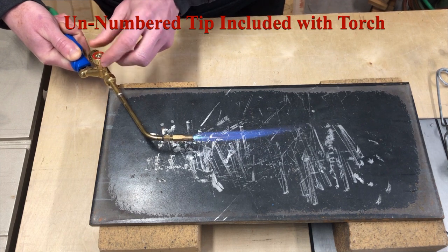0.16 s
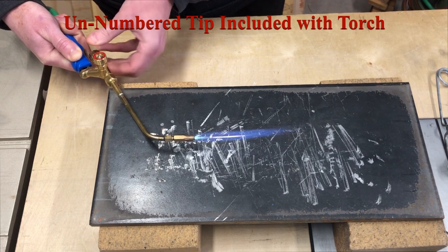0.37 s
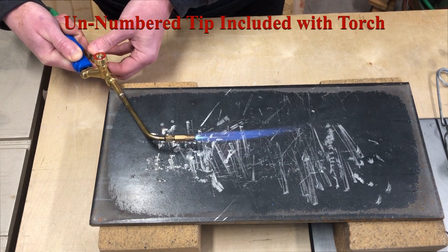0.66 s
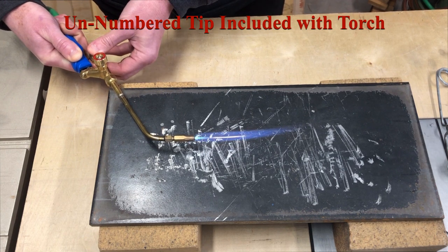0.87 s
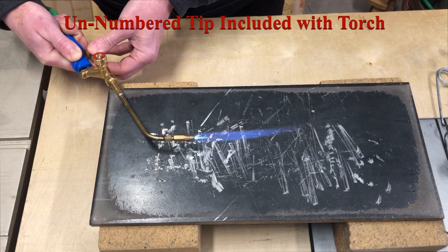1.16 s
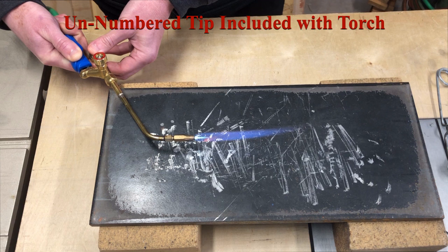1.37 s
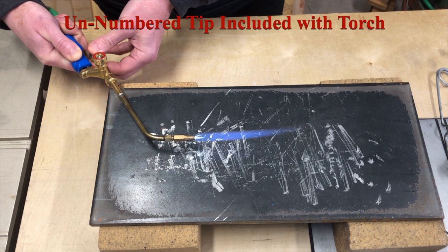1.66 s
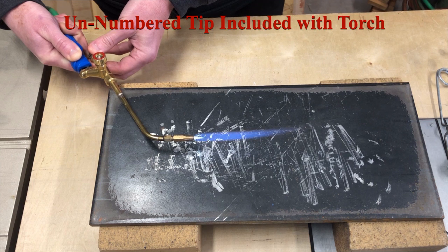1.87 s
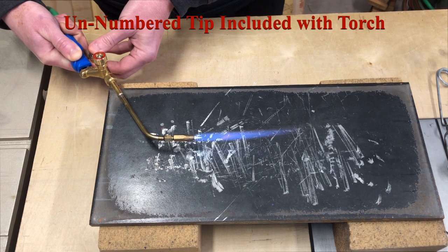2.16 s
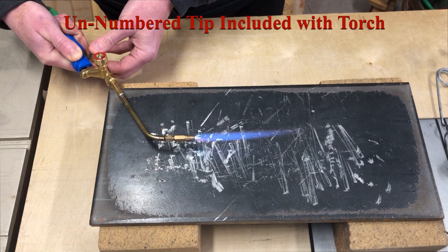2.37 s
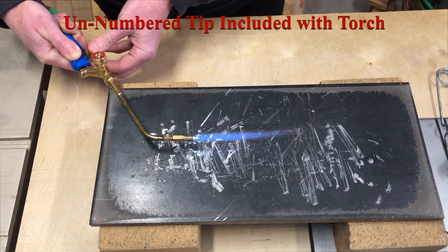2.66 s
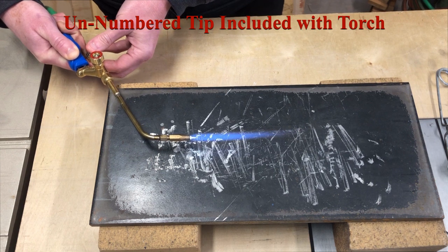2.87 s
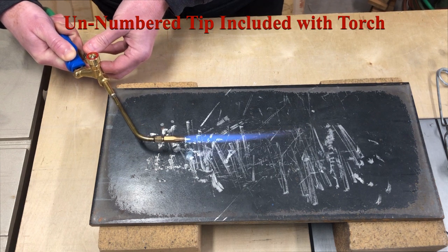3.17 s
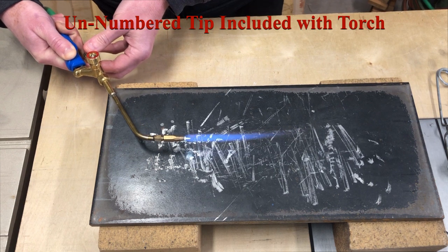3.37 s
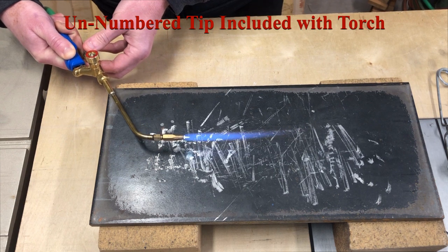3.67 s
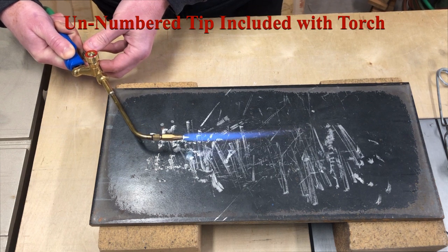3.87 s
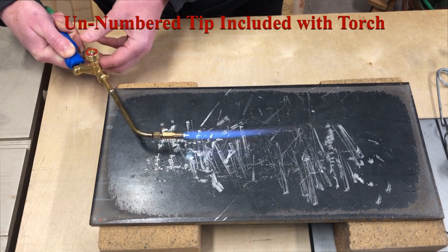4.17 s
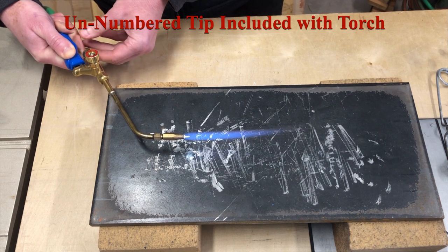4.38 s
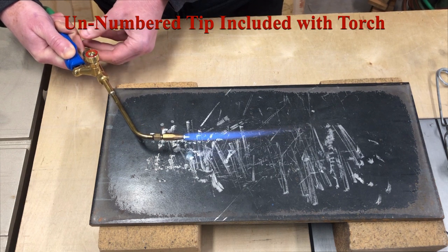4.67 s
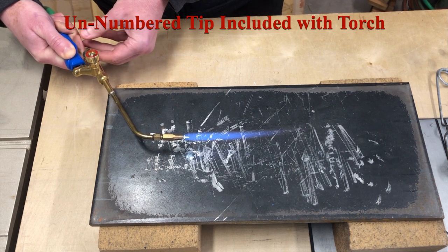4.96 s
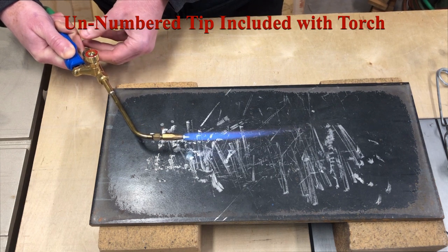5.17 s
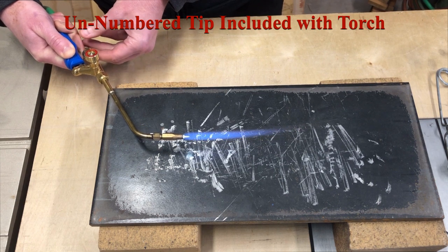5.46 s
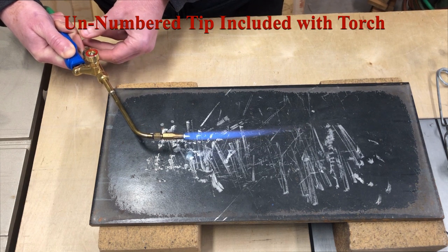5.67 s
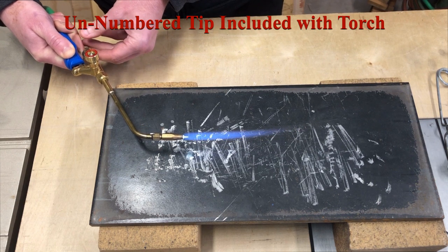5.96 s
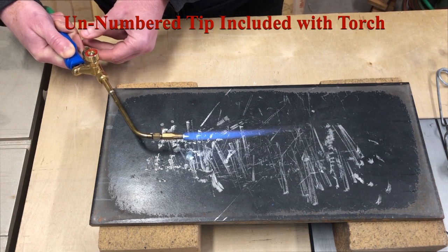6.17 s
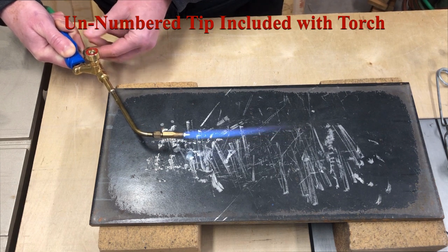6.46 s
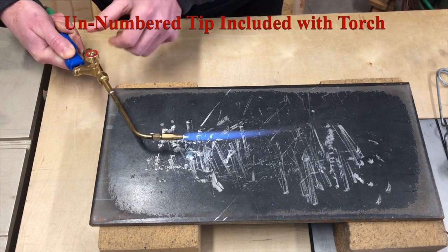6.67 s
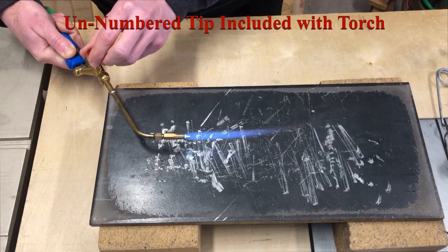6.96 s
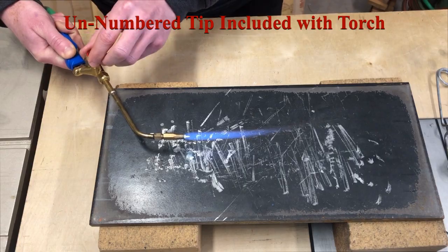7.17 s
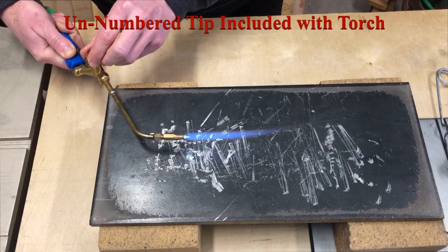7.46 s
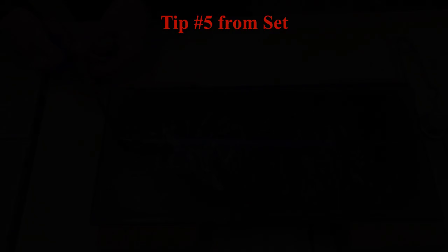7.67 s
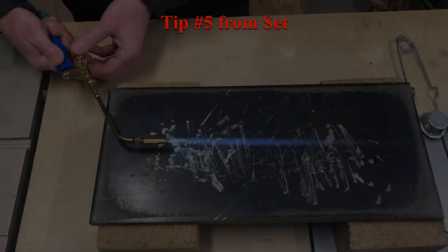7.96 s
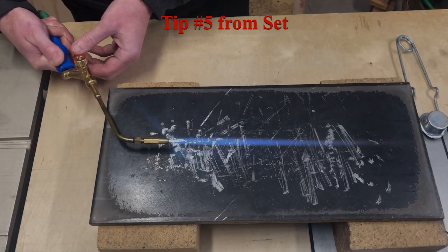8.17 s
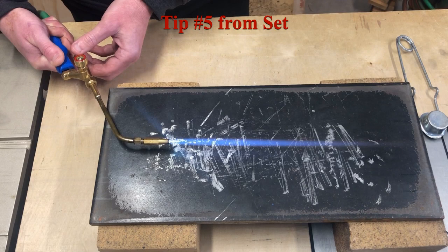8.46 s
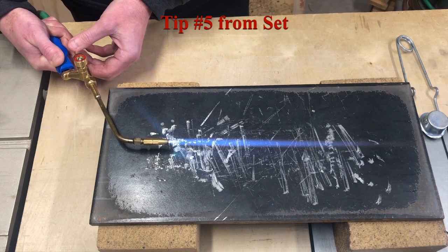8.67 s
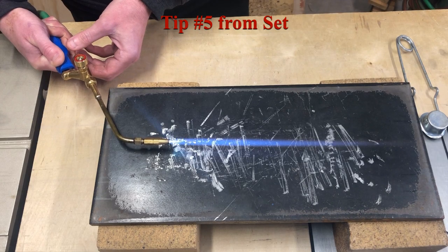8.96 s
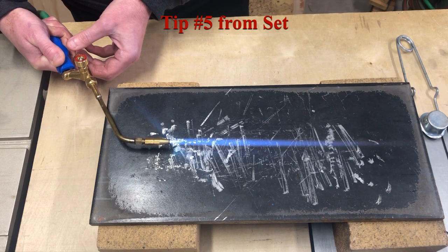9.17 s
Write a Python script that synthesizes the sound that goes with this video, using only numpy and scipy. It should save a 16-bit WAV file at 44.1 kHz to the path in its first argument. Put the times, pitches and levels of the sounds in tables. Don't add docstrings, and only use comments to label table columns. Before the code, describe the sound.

A small gas flame sputters softly, grows into a steady hissing roar as its valve opens, then abruptly becomes a far louder, brighter jet.

```python
import sys
import numpy as np
from scipy import signal
from scipy.fft import rfft, irfft, next_fast_len
from scipy.io import wavfile
from scipy.ndimage import uniform_filter1d

SR = 44100
rng = np.random.default_rng(int(sys.argv[2]) if len(sys.argv) > 2 else 0)


def int16_out(signal):
    q = np.round(np.clip(np.atleast_2d(signal).T, -1, 1) * 32767)
    wavfile.write(sys.argv[1], SR, q.astype(np.int16))


def rack_gain(trim_db):
    fader = np.asarray(trim_db, float)
    return 10 ** (fader / 20)


N = 411012

CHANGE_S = 7.652
EDGE_HZ = 15745
FRAME_S = 1001 / 24000
SMALL_SPLICE_S, LARGE_SPLICE_S = .01846, .02172

# time in seconds, opening (0 low flame, 1 half open, 2 and more wide open).
VALVE_OPENING = [
    (0, 0.045),
    (1.2, 0.24),
    (1.8, 0.5),
    (2.4, 0.71),
    (3.2, 0.94),
    (3.6, 1.66),
    (4.1, 2.43),
    (6, 2.71),
    (7.65, 3.02),
]
# time in seconds, roar level in dB.
FLAME_STRENGTH = [(0, -57), (1.0, -56.5), (1.4, -54.5), (1.9, -51), (2.8, -51), (3.05, -53), (3.35, -53),
                  (3.55, -51), (4.1, -52), (5.3, -50), (6.5, -51.5), (7.4, -50), (7.65, -51)]
# valve opening, throat level in dB, jet level in dB.
LAYER_BALANCE = [(0, -10.5, -11.5), (.22, -12.5, -16), (.48, -12.5, -9), (.8, -6.5, -9), (.95, -5, -6.5),
                 (1.7, -9, -6), (2.1, -10, -5), (2.6, -10, -5), (3.2, -8.5, 0)]
# middle in seconds, length in seconds, change in dB.
SPUTTERS = [
    (.02, 0.033, -0.5),
    (.23, 0.094, -2.5),
    (.5, 0.061, -2.5),
    (.7, 0.075, -3),
    (.9, 0.096, -2),
    (1.25, .05, -1),
    (5.93, 0.087, -2),
    (6.72, 0.052, 1),
]
# middle in seconds, length in seconds, change in dB.
DRAUGHTS = [(.4, .3, 4.5), (.62, 0.1, 2), (.97, 0.54, 5), (1.33, 0.11, 1), (1.63, .2, 6), (1.79, 0.14, 5),
            (1.92, 0.19, 6.5), (2.14, 0.28, 5.5), (2.4, 0.17, 4.5), (2.75, 0.18, 3), (3.15, 0.55, -4),
            (5.1, .7, 2.5), (6.9, .3, 1.5), (7.35, 0.36, 5)]
# frequency in Hz, strength in dB per Hz.
ROAR_COLOURS = [
    [(470, -51), (800, -16), (984, -10), (1230, -8), (1270, -5.5), (1340, -4), (1570, -5), (1990, -3.5),
     (2190, -7), (2350, 0.5), (3300, -14), (4290, -58), (7260, -120)],
    [(470, -52), (800, -23), (984, -17), (1150, -15.5), (1290, -9.5), (1460, -7), (1820, -6), (1950, -5.5),
     (2100, -4.5), (2650, -2.5), (3300, -8), (4290, -35), (7260, -120)],
    [(470, -36), (800, -18), (1210, -11), (1330, -6), (1400, -7), (1830, -4), (1950, -3), (2190, -3.5),
     (2330, -0.5), (2680, -2), (3300, -9), (4290, -29.5), (7260, -120)],
]
# frequency in Hz, strength in dB per Hz.
FLAP_COLOURS = [
    [(150, -40), (250, -12.5), (355, -3), (499, 0.5), (589, -6), (701, 0.5), (755, -7.5), (800, -20),
     (1040, -46), (1760, -120)],
    [(150, -44), (250, -12), (302, -4), (455, -1), (595, -4), (671, 1.5), (755, -0.5), (800, -8),
     (1040, -43), (1760, -120)],
    [(150, -49), (250, -10.5), (360, -3.5), (409, -5), (509, -0.5), (595, -6.5), (695, 3.5), (800, -17),
     (1040, -38), (1760, -120)],
]
# frequency in Hz, strength in dB per Hz.
THROAT_COLOURS = [
    [(1940, -40), (3300, -18), (3500, -5.5), (3890, -3), (4600, -8.5), (5960, -12.5), (6600, -13.5),
     (7400, -19), (9620, -54), (16300, -120)],
    [(1940, -28), (3300, 1.5), (4040, -6.5), (4660, -2.5), (5570, -8.5), (6080, -8.5), (6600, -5.5),
     (7400, -5), (9620, -33), (16300, -120)],
    [(1940, -36), (3300, -2), (3870, -6), (4640, -3.5), (4980, -5.5), (5800, -10.5), (6780, -7.5),
     (7400, -11), (9620, -38), (16300, -120)],
]
# frequency in Hz, strength in dB per Hz.
JET_COLOURS = [
    [(4350, -50), (7400, -26), (7800, -12), (8130, -9), (8470, 2), (9240, -4), (10200, 9.5), (12300, -15),
     (13100, -5), (15600, -7)],
    [(4350, -26), (7400, -8), (8210, -10), (8600, -4.5), (8850, -4), (9570, -6), (10800, -1), (12300, -8),
     (13500, 5.5), (15600, -4)],
    [(4350, -76), (7400, -10), (8660, -4), (9040, -4), (9480, -5), (10900, 0.5), (12000, -11.5),
     (13300, -1), (15600, -9)],
]
# frequency in Hz, width in Hz, lift in dB.
SMALL_TUBE = [(710, 105, 3.5), (810, 91, -6), (930, 40, -4), (1050, 25, -1), (1196, 48, -5),
              (1510, 34, 2.5), (3460, 50, 1), (3610, 37, -1), (1323, 35, 7.5), (1440, 91, 0),
              (1690, 74, 2.5), (1844, 50, -6), (1986, 52, 2.5), (2060, 50, 1), (2100, 46, -2),
              (2330, 89, 2), (2500, 48, -4.5), (2605, 130, 4), (2792, 46, 3.5), (2870, 60, -2),
              (2997, 90, 4.5), (3126, 80, -4), (3272, 70, 3), (3375, 50, -6.5), (3800, 50, -1),
              (4420, 90, 4), (4545, 90, 5.5), (4690, 110, 4), (4800, 100, 0), (4970, 72, 0), (5460, 50, 0),
              (5700, 60, -1), (5700, 90, 3.5), (5950, 90, -2), (6110, 76, 4.5), (6230, 70, -4),
              (6420, 74, 5), (6470, 50, -4), (6840, 74, -5.5), (6930, 85, 3.5), (7090, 60, 0),
              (7220, 60, -7), (8810, 270, 6.5), (9300, 250, -1), (10930, 150, -5), (11300, 180, 1),
              (11400, 90, 5), (11840, 250, 4), (13470, 80, -3), (14150, 250, -2.5), (14450, 250, 3),
              (15770, 150, 11.5)]


def small_tip():
    t = np.arange(N) / SR
    flame_db = curves(FLAME_STRENGTH, t)[0]
    sputter_db = swells(SPUTTERS, t)
    throat_over_db, jet_over_db = curves(LAYER_BALANCE, curves(VALVE_OPENING, t)[0])
    roar_db = flame_db + sputter_db + 0.25 * drift(20.0, 3.4)
    flap_db = -71 + swells(DRAUGHTS, t) + 0.91 * sputter_db + 0.7 * drift(27.0, 5.)
    throat_db = flame_db + throat_over_db + 0.27 * sputter_db + 0.22 * drift(11.0)
    jet_db = flame_db + jet_over_db + 0.69 * sputter_db + 0.34 * drift(22.0)

    flutter, lick = drift(90.0), drift(32.0)
    roar_db += 0.49 * flutter + 0.53 * drift(400.)
    flap_db += 0.39 * flutter + 0.32 * lick
    throat_db += 0.24 * flutter
    jet_db += 0.2 * flutter + 0.57 * drift(400.)

    roar = turbulence(ROAR_COLOURS, SMALL_TUBE, patchy_db=0.38, ripple_db=1.23, size=2048)
    flap = turbulence(FLAP_COLOURS, SMALL_TUBE, patchy_db=0.9, ripple_db=0.6, size=2048)
    throat = turbulence(THROAT_COLOURS, SMALL_TUBE, slab_and_valve, patchy_db=0.63, ripple_db=2.1)
    jet = turbulence(JET_COLOURS, SMALL_TUBE, slab_and_valve, patchy_db=0.95, ripple_db=0.5, size=512)
    return rack_gain(roar_db) * roar + rack_gain(flap_db) * flap + rack_gain(throat_db) * throat + rack_gain(jet_db) * jet


# time in seconds, centre in Hz, depth in dB.
SLAB_VALLEY = [(0, 7300, 11), (1, 7640, 1), (2, 7700, 8), (2.9, 8260, 8), (3.5, 7440, 9), (4.5, 7300, 10),
               (6.5, 7300, 9), (6.9, 7450, 11), (7.65, 7600, 13)]
# time in seconds, frequency in Hz, lift in dB.
VALVE_WHISTLE = [(0.0, 6600, 4), (0.9, 6650, 5), (1.3, 6630, 12), (1.81, 6750, 6), (2.26, 6650, 5),
                 (2.77, 6610, 11.5), (4.3, 6740, 14), (4.7, 6750, 10), (5.45, 6770, 11), (5.91, 6880, 14),
                 (7.64, 6600, 7)]
# time in seconds, frequency in Hz, lift in dB.
TOP_RIDGE = [(0, 13300, 6), (2, 13000, 1), (3.2, 13400, -2.5), (4.5, 13600, 5.5), (6, 13200, 6),
             (7, 13300, 7.5), (7.65, 12900, 10.5)]
# middle in seconds, length in seconds, rise in Hz.
RIDGE_LEAPS = [(.035, .025, 1100), (.165, 0.023, 900), (.31, .03, 900), (.367, .025, 1300),
               (.41, .015, 1000), (.437, .02, 1200), (.56, .04, 1900), (.625, .03, 1300), (.72, .04, 700),
               (.84, .04, 1000), (.95, .025, 900), (.995, .025, 900), (1.04, .03, 800), (1.11, .03, 700),
               (1.27, .03, 1200), (1.31, .03, 900), (1.345, .03, 1600), (1.4, 0.03, 900),
               (1.52, 0.039, 1300)]
# middle in seconds, length in
# seconds, centre in Hz, width in Hz, change in dB.
HISS_CHANGES = [(.25, .04, 5900, 2200, -9), (.285, .015, 5800, 2200, -8), (.45, .02, 6200, 1500, -7),
                (.49, .04, 6000, 2400, -9), (.71, .04, 6000, 3200, -10), (.77, .02, 6400, 3200, -8),
                (.875, .03, 6400, 2400, -9), (.92, .035, 6000, 2400, -9), (.87, .03, 11000, 4000, -7),
                (1.43, .24, 13400, 700, 5), (1.25, .02, 10500, 2500, -5), (1.55, .1, 12000, 1200, -4),
                (.085, .06, 10200, 1500, 4), (.165, .035, 10500, 2000, 6), (.25, .03, 10500, 2500, -5),
         (.335, .025, 10500, 2500, -5), (.5, .07, 10700, 2200, -6), (.45, .09, 8700, 900, 5),
         (.71, .1, 10500, 2200, -5), (.83, .05, 10500, 2200, 3), (.91, .05, 10500, 2200, -6),
         (1.19, .1, 12000, 1800, 5), (1.385, .07, 11000, 1200, -5), (1.455, .05, 9100, 1800, 3),
         (1.51, .05, 10200, 1500, -5), (.6, 1.3, 12300, 900, 3), (.7, 1.4, 9300, 300, -4),
         (.6, 1.1, 13400, 700, 3), (2.6, 1.5, 9450, 450, -5), (4.05, .5, 4470, 500, -3.5),
         (1.43, .24, 13450, 450, 1), (1.49, .12, 11400, 1500, -7), (6.85, .25, 7700, 700, -3),
         (7.05, 0.55, 8800, 600, -4), (5.5, .3, 4600, 500, 1), (6.55, .4, 5900, 700, -2)]


def slab_and_valve(hz, t):
    valley_hz, depth_db = curves(SLAB_VALLEY, t)
    whistle_hz, whistle_db = curves(VALVE_WHISTLE, t)
    ridge_hz, ridge_db = curves(TOP_RIDGE, t)
    change_db = whistle_db * bell(hz, whistle_hz, 164.0)
    change_db += ridge_db * bell(hz, ridge_hz, 1300.0)
    change_db -= depth_db * bell(hz, valley_hz, 780.0)

    tears = rng.standard_normal((len(t), len(hz))).T
    tears = uniform_filter1d(tears, size=len(hz) // 8, axis=0)
    tears = evened(uniform_filter1d(tears, size=2, axis=1))
    starved = np.clip(1 - 0.96 * curves(VALVE_OPENING, t)[0], 0, 1) * bell(hz, 9000.0, 5000.)
    change_db += 3.5 * starved * tears

    rest_hz, width_hz, leap_db = 10200., 1300., 12
    rise_hz = sum(rise * np.exp(-(2 * (t - s) / length) ** 2) for s, length, rise in RIDGE_LEAPS)
    change_db += leap_db * (bell(hz, rest_hz + rise_hz, width_hz) - bell(hz, rest_hz, width_hz))
    return change_db + moments(HISS_CHANGES, hz, t)


# time in seconds, level in dB.
LARGE_FLOW = [(7.65, -37), (8.2, -36), (8.3, -35.5), (8.85, -35.5), (8.95, -37), (9.03, -34.5), (9.32, -35)]
# middle in seconds, length in seconds, change in dB.
SURGES = [(7.68, 0.026, 0.5), (7.76, .04, 1.5), (7.92, .04, 0.5), (8.95, 0.027, 0), (9.08, 0.034, 2),
          (7.885, 0.058, -2.5), (7.965, 0.017, 0), (8.0, 0.02, -4), (8.103, 0.026, -3), (8.135, .03, 2),
          (8.225, 0.033, -1), (8.275, 0.066, 2.5), (8.51, 0.053, 1), (8.66, 0.018, -5), (8.72, 0.017, 4.5),
          (9.115, .02, -0.5), (9.235, 0.018, 3), (9.275, 0.013, 2)]
# middle in seconds, length in seconds, swell in dB.
LOW_SWELLS = [
    (7.955, .025, 3),
    (8.053, 0.064, 4.5),
    (8.172, 0.038, 2.5),
    (8.222, 0.033, 7),
    (8.907, 0.025, 2.5),
    (8.99, 0.05, 4.5),
    (9.27, 0.035, 4),
]
# frequency in Hz, strength in dB per Hz.
LARGE_ROAR = [(350, -45), (600, -21), (658, -5), (745, -8.5), (967, 0.5), (1170, 2.5), (1620, -4),
              (1900, -11.5), (2470, -31), (4180, -120)]
# frequency in Hz, strength in dB per Hz.
LARGE_LOW = [(1120, -32), (1900, -11.5), (3110, -3.5), (3490, 2.5), (4080, -9), (4500, -1.5), (5000, -12),
             (6500, -44), (11000, -120)]
# frequency in Hz, strength in dB per Hz.
LARGE_JET = [(2940, -63), (5000, -18), (5500, -3.5), (6100, -13), (6430, -8), (6540, 2.5), (8500, 4),
             (10500, -1), (11500, -0.5), (12850, 1), (13150, 5), (13600, -24), (22000, -80)]
# frequency in Hz, strength in dB per Hz.
LARGE_TOP = [(7760, -60), (12900, -30), (13250, -9), (13900, -4), (14300, 0), (14900, -1), (15200, -3),
             (15500, 0), (16500, 0)]
# frequency in Hz, strength in dB per Hz.
PIPE_TONE = [(4400, -78), (5250, -18), (5470, -5), (5535, -1), (5680, -7), (5900, -17), (7000, -70)]
# frequency in Hz, width in Hz, lift in dB.
LARGE_TUBE = [(684, 55, 2), (1150, 480, 1.5), (2220, 390, 7), (2670, 470, 4), (3130, 80, -4),
              (3490, 130, 4), (3540, 120, -6.5), (3900, 350, 1), (4200, 130, -3), (4030, 100, 2),
              (4300, 70, -2), (4385, 140, 7), (4700, 120, -3), (4560, 260, 4.5), (5620, 620, 10),
              (6060, 120, 1), (6250, 120, 5), (6530, 200, 4), (7300, 420, 2.5), (7600, 110, 1.5),
              (7760, 250, -2), (8300, 200, 2), (8700, 250, -2.5), (8980, 220, 5.5), (9100, 350, 0.5),
              (9500, 150, -2), (9980, 430, 6.5), (10480, 150, -7), (10980, 260, 6.5), (11380, 600, 5),
              (12080, 500, 5.5), (12820, 200, 1), (13080, 120, -4), (13250, 90, -13), (13440, 120, 3),
              (13700, 300, 4), (13880, 140, -4), (14000, 220, 5), (14330, 120, -2), (14730, 100, 3),
              (15200, 160, -4)]


def large_tip():
    t = np.arange(N) / SR
    flow_db = curves(LARGE_FLOW, t)[0]
    surge_db, swell_db = swells(SURGES, t), swells(LOW_SWELLS, t)
    bursts = drift(330.0, 16.0)

    roar_db = -52.5 + 0.5 * swell_db + 0.38 * drift(40.) + 0.2 * bursts
    low_db = -51 + swell_db + 0.42 * surge_db + 0.5 * bursts
    jet_db = flow_db + surge_db + 1.87 * bursts
    top_db = flow_db - 7 + 1.5 * (t - CHANGE_S)
    top_db += 0.54 * surge_db - 0.9 * swell_db + 0.6 * bursts + 1.2 * drift(300.)
    pipe_db = flow_db - 12.5 + 2 * np.tanh((t - 8.05) / .15)
    pipe_db += 0.4 * surge_db + 0.5 * bursts

    out = rack_gain(roar_db) * turbulence([LARGE_ROAR], LARGE_TUBE, patchy_db=1.0, ripple_db=1.5)
    out += rack_gain(low_db) * turbulence([LARGE_LOW], LARGE_TUBE, large_changing, patchy_db=0.75, ripple_db=0.6)
    out += rack_gain(jet_db) * turbulence([LARGE_JET], LARGE_TUBE, large_changing, patchy_db=1.5, ripple_db=-0.5)
    out += rack_gain(top_db) * turbulence([LARGE_TOP], LARGE_TUBE, patchy_db=1.5, ripple_db=0.4)
    return out + rack_gain(pipe_db) * turbulence([PIPE_TONE], patchy_db=0.5, ripple_db=0.0)


# middle in seconds, length in seconds, centre in Hz,
# width in Hz, change in dB.
LARGE_CHANGES = [(7.95, .03, 2600, 1200, 3), (8.06, 0.04, 3200, 990, 5), (8.225, 0.04, 3200, 1300, 6.5),
                 (7.72, .05, 3400, 400, 3), (8.14, .03, 3300, 500, 3), (8.225, .04, 4500, 700, -2),
                 (9.0, .05, 4200, 500, -1), (9.265, 0.093, 7900, 3000, -4.5), (6, 0.035, 12700, 2400, -11),
                 (8.055, .025, 13100, 1500, -5), (7.72, .12, 8300, 200, 1), (7.965, .02, 7500, 200, 8),
                 (7.965, .03, 6650, 250, 2), (8.13, .15, 7520, 160, 7), (8.27, .06, 9500, 300, 5)]


def large_changing(hz, t):
    brighter_db = 3.5 * np.maximum(t - CHANGE_S, 0) * bell(hz, 11400.0, 4000.)
    return moments(LARGE_CHANGES, hz, t) + brighter_db


def turbulence(colours, tube=(), moving=None, patchy_db=1.5, ripple_db=1.5, size=1024):
    hop = size // 4
    t = np.arange(N // hop + 5) * hop / SR
    hz = np.fft.rfftfreq(size, 1 / SR)[:, None]
    a, b, patches = rng.standard_normal((len(t), len(hz), 3)).T
    patches = uniform_filter1d(patches, size=14, axis=0)
    patches = evened(uniform_filter1d(patches, size=8, axis=1))

    opening = np.clip(curves(VALVE_OPENING, t)[0], 0, len(colours) - 1)
    field_db = sum(np.maximum(1 - abs(opening - k), 0) * read(c, hz) for k, c in enumerate(colours))
    field_db += sum(db * bell(hz, f, w) for f, w, db in tube)
    field_db += patchy_db * patches
    field_db += ripple_db * rng.standard_normal(hz.shape)
    if moving:
        field_db += moving(hz, t)

    gain = rack_gain(field_db) * (hz < 1.02 * EDGE_HZ)
    gain /= np.sqrt((gain ** 2).mean(0))
    noise = signal.istft((a + 1j * b) * gain, nperseg=size, noverlap=size - hop)[1]
    return evened(noise[:N])


def drift(top_hz, low_hz=2.):
    size = next_fast_len(N // 8 + 2)
    hz = np.fft.rfftfreq(size, 8 / SR)
    shape = (hz > low_hz) / np.sqrt(hz + 4) / (1 + (hz / top_hz) ** 2)
    slow = irfft(rfft(rng.standard_normal(size)) * shape, size)
    return evened(np.interp(np.arange(N) / 8, np.arange(size), slow))


def swells(events, t):
    coarse = t[::64]
    db = sum(db * np.exp(-(2 * (coarse - s) / length) ** 4) for s, length, db in events)
    return np.interp(t, coarse, db)


def moments(events, hz, t):
    return sum(db * np.exp(-(2 * (hz - f) / w) ** 4 - (2 * (t - s) / length) ** 4)
               for s, length, f, w, db in events)


def bell(hz, centre_hz, width_hz):
    return 1 / (1 + (2 * (hz - centre_hz) / width_hz) ** 2)


def curves(rows, t):
    s, *columns = np.transpose(rows)
    return [np.interp(t, s, c) for c in columns]


def read(points, hz):
    f, value = np.transpose(points)
    return np.interp(np.log(hz + 1), np.log(f + 1), value)


def evened(x):
    return x / np.sqrt(np.mean(x ** 2) + 1e-20)


def workshop(x, wet_db=-13., t60=.25):
    t = np.arange(SR // 4) / SR
    tail = signal.lfilter([1], [1, -.25], rng.standard_normal(len(t)))
    tail *= rack_gain(-60 * t / t60) * (t > .004)
    wet = rack_gain(wet_db) * signal.oaconvolve(x, tail / np.linalg.norm(tail))[:N]
    return (x + wet) / np.sqrt(1 + rack_gain(2 * wet_db))


def spliced(x, splice_s, most):
    piece = np.floor((np.arange(N) / SR - splice_s) / FRAME_S).astype(int) + 1
    slip = rng.integers(-most, most + 1, piece[-1] + 1)
    return x[np.clip(np.arange(N) + slip[piece], 0, N - 1)]


# time in seconds, level in dB.
BAD_JOINTS = [(.394, -72), (.811, -73), (1.436, -76), (1.855, -73), (1.897, -71), (1.939, -69),
              (2.104, -65), (2.148, -73), (2.187, -66), (2.773, -72), (2.813, -72), (3.273, -75),
              (3.356, -75), (3.982, -76), (4.023, -79), (4.105, -75), (4.188, -74), (4.271, -75),
              (4.565, -70), (4.69, -70), (5.734, -73), (5.859, -74), (6.066, -78), (6.108, -75),
              (6.233, -71), (6.317, -73), (6.524, -75), (6.941, -71), (6.985, -69), (7.068, -74),
              (7.151, -76), (7.317, -75), (7.36, -74), (7.402, -75)]


def thumps():
    s, db = np.transpose(BAD_JOINTS)
    joint = SMALL_SPLICE_S + np.round((s - SMALL_SPLICE_S) / FRAME_S) * FRAME_S
    train = np.zeros(N)
    train[np.round(joint * SR).astype(int)] = rack_gain(db + 41) * rng.choice([-1., 1.], len(s))
    bump = np.exp(-(np.arange(-100, 101) / SR / .0004) ** 2)
    return np.convolve(train, bump / bump.sum(), "same")


def rumble(colour, db):
    return rack_gain(db + 0.5 * drift(30.)) * turbulence([colour], patchy_db=0.5, ripple_db=1.5, size=4096)


# frequency in Hz, strength in dB per Hz.
SMALL_AIR = [(12, -41), (20, -36), (55, -20), (86, -7), (128, -12.5), (148, -7), (165, 3.5), (185, -9),
             (221, -0.5), (247, -13), (300, -3), (390, -18), (660, -120)]
# frequency in Hz, strength in dB per Hz.
LARGE_AIR = [(12, -42), (20, -28), (50, -11), (147, -2.5), (228, -5.5), (290, -9.5), (349, -5.5),
             (458, -14), (485, -7.5), (600, -13), (780, -44), (1320, -120)]


def scene():
    small = workshop(small_tip(), wet_db=-17.) + rumble(SMALL_AIR, -79.5)
    large = workshop(large_tip()) + rumble(LARGE_AIR, -68)
    small = spliced(small, SMALL_SPLICE_S, most=30)
    large = spliced(large, LARGE_SPLICE_S, most=4)
    lost_s = np.arange(.0195, CHANGE_S, FRAME_S)
    small[np.round(lost_s * SR).astype(int)] = 0
    return np.where(np.arange(N) < CHANGE_S * SR, small + thumps(), large)[None]


def low_pass(x):
    return signal.sosfilt(signal.butter(12, 16860, fs=SR, output="sos"), x)


def record(dry):
    limit = signal.firwin(2047, EDGE_HZ, window=("kaiser", 10), fs=SR)
    mix = signal.oaconvolve(dry, limit[None], "same")
    return low_pass(mix)


dry = scene()
out = record(dry)
int16_out(out)
```